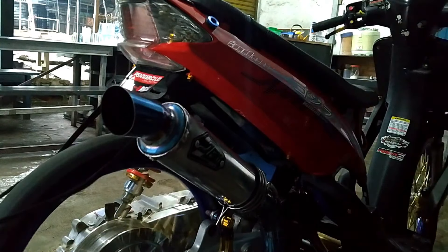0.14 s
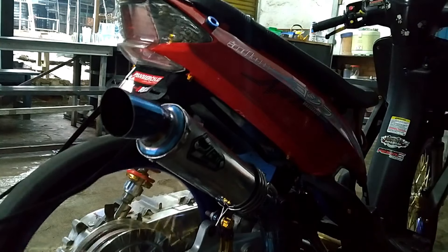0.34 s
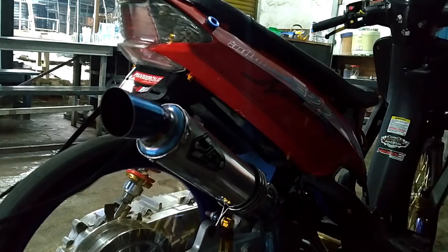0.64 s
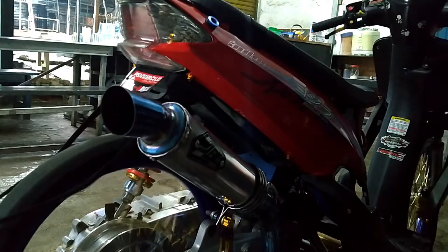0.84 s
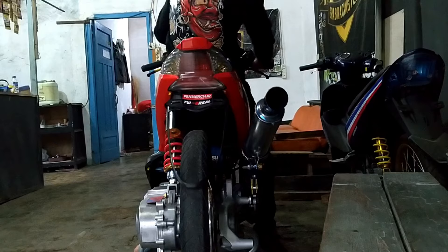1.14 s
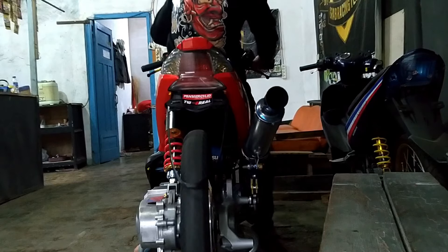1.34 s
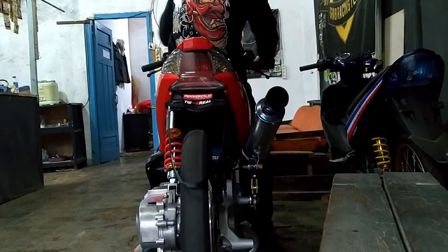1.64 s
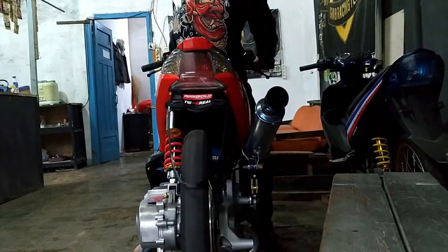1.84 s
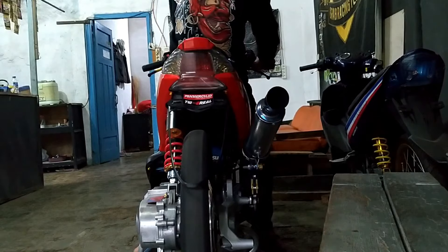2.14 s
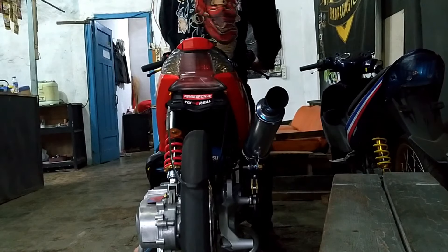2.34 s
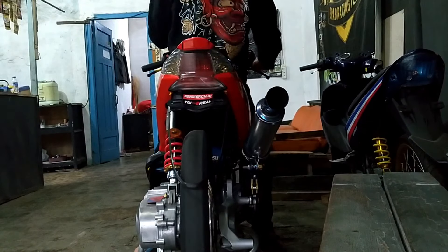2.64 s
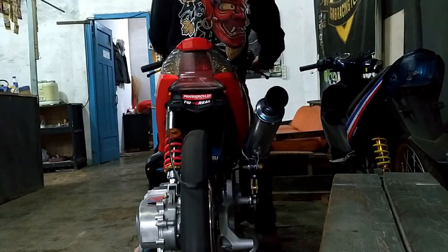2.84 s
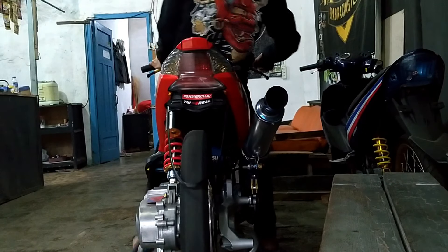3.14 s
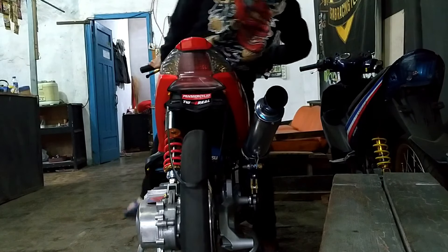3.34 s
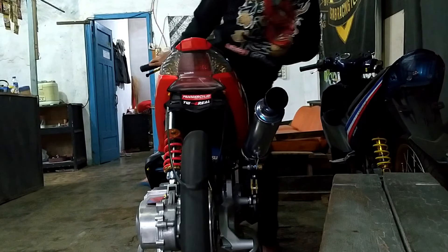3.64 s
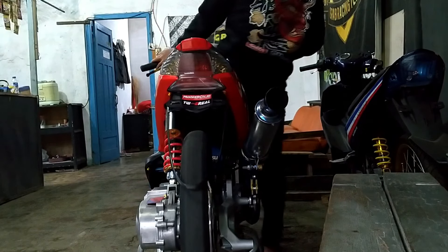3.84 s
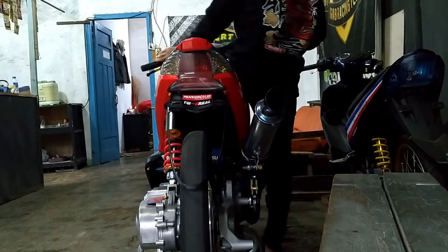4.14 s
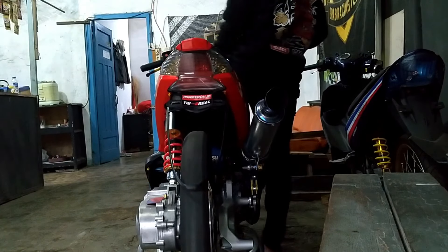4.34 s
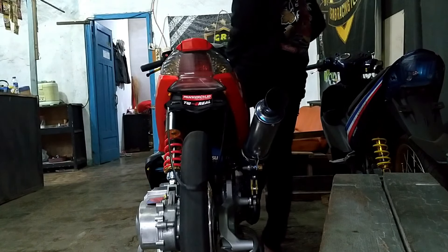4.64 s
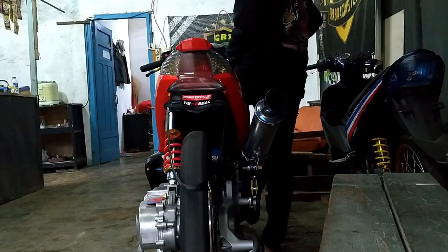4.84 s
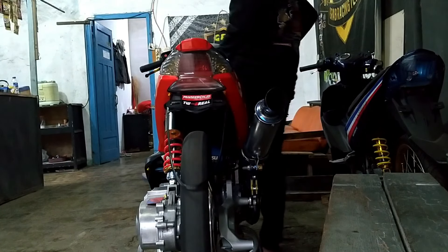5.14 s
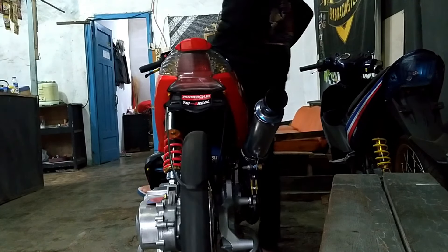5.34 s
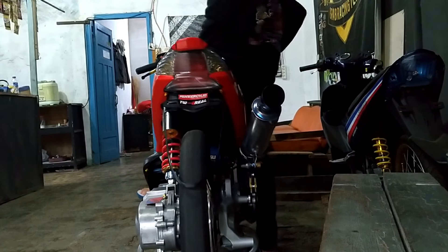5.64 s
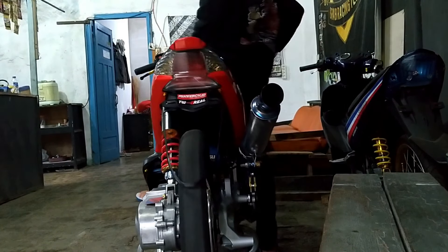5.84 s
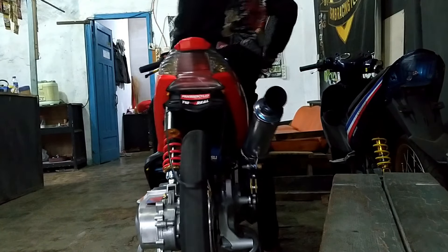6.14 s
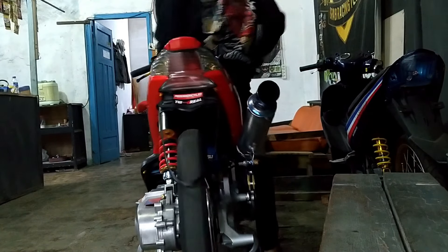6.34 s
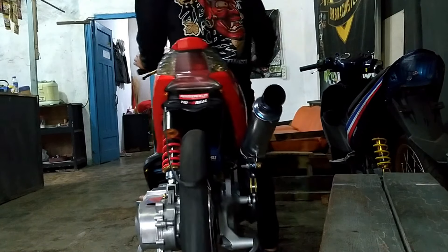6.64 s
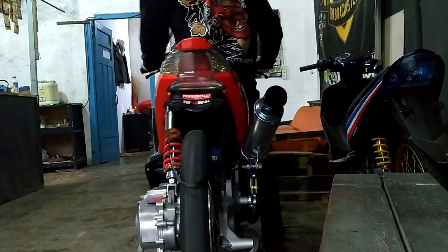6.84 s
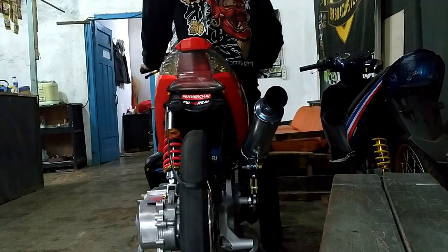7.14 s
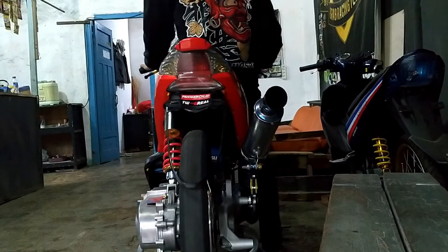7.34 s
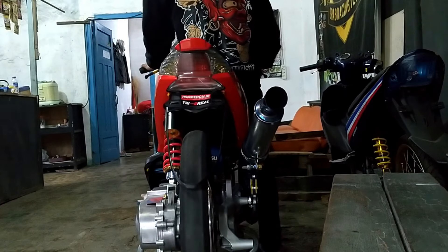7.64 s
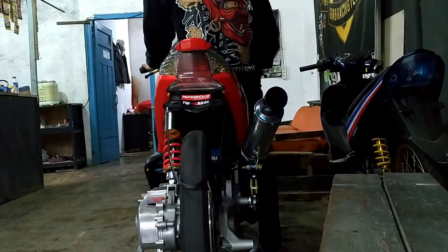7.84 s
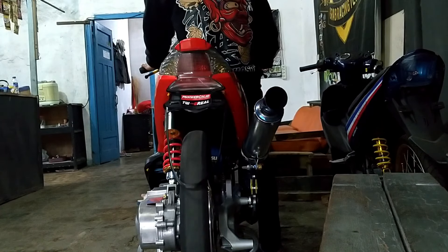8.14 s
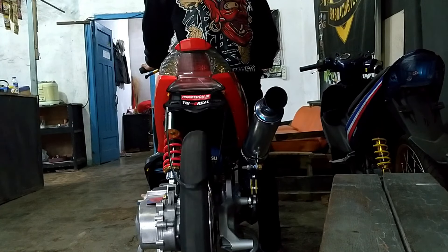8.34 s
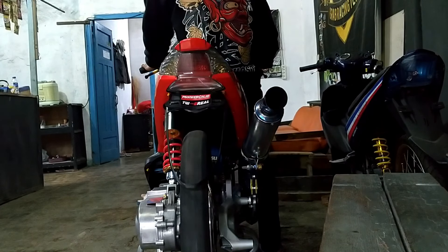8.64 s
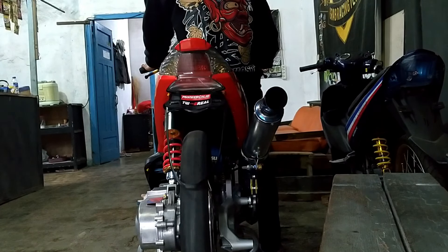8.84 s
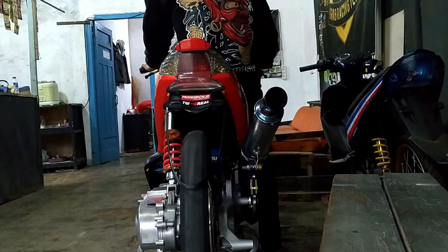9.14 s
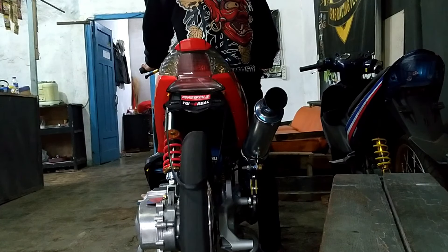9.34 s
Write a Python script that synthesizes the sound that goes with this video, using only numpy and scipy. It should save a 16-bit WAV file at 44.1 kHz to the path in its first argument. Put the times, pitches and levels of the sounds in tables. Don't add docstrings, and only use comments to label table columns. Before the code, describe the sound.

Loud small-motorcycle exhaust: one close crackling rev, an abrupt cut to a boomy workshop, uneven thumping idle with misfires and pops, final throttle blip starting.

```python
import sys
import numpy as np
from scipy import signal
from scipy.fft import rfft, irfft, next_fast_len
from scipy.io import wavfile
from scipy.ndimage import uniform_filter1d, minimum_filter1d, map_coordinates

SR = 44100
rng = np.random.default_rng(int(sys.argv[2]) if len(sys.argv) > 2 else 0)


def materialize(psi):
    bounded = np.clip(np.atleast_2d(psi).T, -1, 1)
    quanta = np.round(bounded * 32767).astype(np.int16)
    wavfile.write(sys.argv[1], SR, quanta)


def attenuation_scalar(level_db):
    decades = np.asarray(level_db, float) / 20
    return 10 ** decades


N = 418068
CUT = 1.078
TIME = np.arange(N) / SR
BESIDE = TIME < CUT
DECAY_TIME = np.arange(SR // 2) / SR


def unit(x):
    return x / np.sqrt(np.mean(x ** 2) + 1e-20)


def curves(rows):
    s, *cols = np.transpose(rows)
    return [np.interp(TIME, s, c) for c in cols]


def noise(spectrum, size):
    f, db = np.transpose(spectrum)
    hz = np.fft.rfftfreq(size, 1 / SR)
    colour = attenuation_scalar(np.interp(np.log(hz + 1), np.log(f), db, -120, -120))
    return unit(irfft(rfft(rng.standard_normal(size)) * colour, size))


def tail(spectrum, t60):
    x = noise(spectrum, size=SR // 2) * attenuation_scalar(-60 * DECAY_TIME / t60)
    return x / np.linalg.norm(x)


def train(times, db):
    at = np.clip(np.round(times * SR).astype(int), 0, N - 1)
    return np.bincount(at, attenuation_scalar(db) * np.sqrt(SR * np.abs(np.gradient(times))), N)


def through(x, response):
    y = signal.fftconvolve(np.trim_zeros(x, "b"), response)[:N]
    return np.pad(y, (0, N - len(y)))


def ring(resonances):
    t, x = DECAY_TIME, 0
    for k, (hz, width, db) in enumerate(resonances):
        sign = (-1) ** k
        x = x + sign * attenuation_scalar(db) * width * np.exp(-np.pi * width * t) * np.sin(2 * np.pi * hz * t)
    x = x * (1 - np.exp(-t / 0.00084))
    return x / np.linalg.norm(x)


def thin(x):
    return signal.sosfilt(signal.butter(N=4, Wn=110, btype="high", fs=SR, output="sos"), x)


def already_ringing():
    return -attenuation_scalar(-4.0 - 60 * TIME / 0.12) * np.cos(2 * np.pi * 117 * TIME)


def firings(speed, anchor):
    t = np.arange(speed[0][0], speed[-1][0], 1 / SR)
    turns = np.cumsum(np.interp(t, *np.transpose(speed))) / SR
    first = np.interp(anchor, t, turns) % 1
    return np.interp(np.arange(first, turns[-1]), turns, t)


# time in seconds, firings completed so far.
IDLE = [(1.816, 0), (2.019, 4), (2.132, 6), (2.985, 19), (3.367, 25), (3.744, 31), (4.003, 35), (4.671, 45),
        (5.199, 53), (5.976, 65), (6.771, 77), (7.03, 81), (7.696, 91), (8.235, 99), (8.629, 105),
        (8.756, 107), (9.025, 111), (9.149, 113)]


def idling():
    s, turn = np.transpose(IDLE)
    return np.interp(np.arange(turn[-1] + 1), turn, s)


# time in seconds, firings a second.
COAST_SPEED = [(0.0, 39.0), (0.114, 36.0), (0.2, 33.6), (0.25, 31.9), (0.335, 30.3)]
# time in seconds, firings a second.
NEAR_SPEED = [(0.34, 31.0), (0.416, 37.0), (0.48, 41.5), (0.65, 50.3), (0.714, 49.1), (0.83, 43.9),
              (1.078, 37.3)]
# time in seconds, firings a second.
REV_SPEED = [(1.167, 17.4), (1.235, 22.1), (1.395, 33.4), (1.445, 36.0), (1.507, 37.7), (1.619, 35.5),
             (1.703, 32.0), (1.753, 28.1), (1.816, 22.9)]
# time in seconds, firings a second.
LAST_SPEED = [(9.202, 19.8), (9.275, 21.7), (9.32, 23.6), (9.37, 24), (9.39, 30.5), (9.43, 28.8),
              (9.48, 28.5)]


def crank():
    near = np.concatenate([firings(COAST_SPEED, .231), firings(NEAR_SPEED, .553)])
    rev, last = firings(REV_SPEED, 1.1671)[:-1], firings(LAST_SPEED, 9.2021)
    return near, np.concatenate([[1.035, 1.103], rev, idling(), last])


# time in seconds, strength in dB.
MISFIRES = [(1.866, -9), (1.917, -3.5), (2.264, -3.5), (2.391, -9), (2.522, -4.5), (3.297, -2),
            (3.428, -3.5), (3.554, -3.5), (4.003, -2.5), (4.538, -8), (8.561, -7), (8.955, -6.5)]


def charges(near, shop):
    shop_db = .8 * rng.standard_normal(len(shop))
    for when, db in MISFIRES:
        shop_db[np.argmin(np.abs(shop - when))] = db
    return .8 * rng.standard_normal(len(near)), shop_db


# time in seconds, opening from 0 to 1.
NEAR_REV = [(0, 0.23), (.08, 0.58), (.325, 0.1), (.345, 0.86), (.5, 0.87), (.6, 0.95), (.735, 0.56),
            (.765, 0.27), (1.07, 0.43)]
# time in seconds, opening from 0 to 1.
SHOP_REV = [(1.09, 0.053), (1.18, 0.07), (1.2, 0.41), (1.25, 0.48), (1.375, 0.69), (1.395, 0.3),
            (1.44, 0.51), (1.52, 0.55), (1.7, 0.32), (2.1, 0.049)]
# time in seconds, opening from 0 to 1.
LAST_REV = [(9.0, 0.0045), (9.13, 0.1), (9.28, 0.23), (9.42, 0.29), (9.48, 0.42)]
# level in dB, dB more at full throttle, dB more for doubled speed,
# dB more while the crank gains speed.
NEAR_MIX = [
    (-9.5, -11, -0.5, 2.5),
    (-7.5, -1, 0, 5),
    (-23, -7, 22.5, -29),
    (-30, 15, 8, 4.5),
    (-12, 6.5, 9.5, -1),
    (-35.5, 11, 8, 2),
    (-55, 18, 4.5, 3.5),
    (-57.5, 5, -1, 3.5),
    (-31, -6, 8, -17),
    (-49, 19, -3, -5),
]
# level in dB, dB more at full throttle,
# dB more for doubled speed, dB more while the crank gains speed.
SHOP_MIX = [(-13.5, -13, 6.5, 2), (-13.5, -10, -3, 3), (-14.5, -2.5, -5, -4), (-53, 24, 4, 11.5),
            (-22.5, 13.5, 7.5, 3.5), (-35.5, 20.5, -1.5, 0.5), (-46, 30, -8, 2), (-52, 0.5, 0.5, 2),
            (-39.5, 6, 14.5, 12), (-54, 16.5, 9.5, 14)]


def layer_levels(near, shop):
    near_hz, idle_hz = 37, 15.2
    pull_from, pull_full = .6, 1.4
    opening, = curves(NEAR_REV + SHOP_REV + LAST_REV)
    levels = []
    for rows, times, hz in (NEAR_MIX, near, near_hz), (SHOP_MIX, shop, idle_hz):
        octaves = -np.log2(hz * np.gradient(times))
        gain = uniform_filter1d(np.gradient(octaves, times), size=3)
        pull = np.clip((gain - pull_from) / (pull_full - pull_from), 0, 1)
        drivers = [np.ones(N), opening, np.interp(TIME, times, octaves), np.interp(TIME, times, pull)]
        levels.append(np.array(rows) @ drivers)
    return np.where(BESIDE, *levels)


# frequency in Hz, level in dB, t60 in seconds, polarity at the microphone.
WORKSHOP = [(76.1, -30.3, 0.654, -1), (100.5, -6.5, 0.227, 1), (112.6, -4.0, 0.115, -1),
            (120.5, -29.7, 0.7, 1), (136.7, -23.4, 0.465, -1), (167.4, -20.6, 0.459, -1),
            (194.6, -17.0, 0.7, 1), (200.2, -9.3, 0.257, 1), (221.8, -18.0, 0.209, -1),
            (242.3, -9.8, 0.252, -1), (259.2, 3.2, 0.179, -1), (258.5, 6.7, 0.104, 1),
            (282.0, -11.0, 0.066, -1), (342.5, -30.0, 0.419, -1), (360.1, -32.2, 0.459, 1),
            (385.5, -23.8, 0.147, -1), (406.4, -38.0, 0.472, 1), (437.0, -27.0, 0.6, -1),
            (466.7, -31.0, 0.177, -1), (543.7, -42.8, 0.398, 1), (598.9, -38.5, 0.311, -1),
            (652.2, -52.8, 0.694, 1)]


def room_modes():
    t, linger, build_s = DECAY_TIME, 1.15, 0.0018
    modes = [sign * attenuation_scalar(db - 60 * t / (linger * t60)) * np.sin(2 * np.pi * hz * t)
             for hz, db, t60, sign in WORKSHOP]
    return np.array(modes) * (1 - np.exp(-t / build_s))


# frequency in Hz, width in Hz, level in dB.
PIPE = [
    (105.4, 15.5, 0),
    (127.5, 25.6, 0),
    (260, 67, 0),
]


def thumps(close, far, modes, thump_db):
    groups = np.split(modes / np.linalg.norm(modes.sum(axis=0)), [5, 8])
    out = 0
    for db, pipe, sign, group in zip(thump_db, PIPE, (1, -1, 1), groups):
        boom = signal.fftconvolve(ring([pipe]), ring([pipe]))[:SR // 3]
        beside = through(close, sign * boom / np.linalg.norm(boom))
        across = attenuation_scalar(0.5) * through(far, group.sum(axis=0))
        out += attenuation_scalar(db) * np.where(BESIDE, beside, across)
    return out


# frequency in Hz, density in dB per Hz.
RUMBLE = [(12, -68.5), (20, -15), (89, -16), (151, -12.5), (195, 3.5), (312, -14), (437, -12.5), (500, -24),
          (650, -38), (1100, -120)]


def rumble(level_db):
    open_air_db = -2.5
    return attenuation_scalar(level_db - 8.0 + open_air_db * BESIDE) * noise(RUMBLE, size=N)


# frequency in Hz, width in Hz, level in dB.
SHOP_BARK = [(206, 20, 3), (264, 21, 11.5), (357, 7.3, 4), (387, 14, -6.5), (438, 9, 8.5),
             (496.4, 25, -2.5), (604.3, 54, -6.5)]


def steep_room(room):
    steep = np.pad(-np.diff(room, n=2), 1) * (1 - np.exp(-DECAY_TIME / .001))
    return steep / np.linalg.norm(steep) + attenuation_scalar(-1.5) * ring(SHOP_BARK)


# frequency in Hz, width in Hz, level in dB.
PIPE_BARK = [(189, 67, 8), (316, 36, -0.5), (372, 31, 6), (462.4, 27, 7), (521, 38, 2), (605, 15, -8),
             (860, 410, -16)]


def bark(close, far, sharp, steep):
    beside = thin(through(sharp * close, ring(PIPE_BARK)))
    return np.where(BESIDE, beside, through(sharp * far, steep))


def gas_flow(close, far, sharp, thump):
    swell = np.exp(-DECAY_TIME / .016) * (1 - np.exp(-DECAY_TIME / .0015))
    gush = np.roll(through(close, np.hanning(SR // 40)), -SR // 65)
    puffs = np.where(BESIDE, gush, through(far, swell))
    puffs /= uniform_filter1d(puffs, SR // 8) + 1e-9
    stops = (close > 0) * np.clip(3 * sharp * rng.uniform(.4, 1.6, N), 0, 1)
    lull = through(np.roll(stops, -SR // 200), np.hanning(SR // 170))
    flow = np.where(BESIDE, (.6 + .4 * puffs) * (1 - .9 * lull), .87 + .13 * puffs)
    return flow * (1 + BESIDE * np.clip(1.1 * thump, -.9, .9))


# frequency in Hz, density in dB per Hz.
BARK = [(160, 14.5), (280, 8.5), (324, 5), (359, -3), (505, 2), (645, -6.5), (1200, -11.5), (1560, -61),
        (2640, -120)]
# frequency in Hz, density in dB per Hz.
RUSH = [(470, 3), (800, 1.5), (924, 0.5), (1330, -3), (1660, -2.5), (2050, -3.5), (2370, -8.5),
        (3160, -12.5), (4050, -21.5), (4990, -25.5), (5400, -32), (7020, -54), (11900, -120)]
# frequency in Hz, density in dB per Hz.
FIZZ = [(2530, -44), (4300, -4.5), (5950, -4.5), (7210, -3.5), (7930, 0), (8190, -21), (8600, -58),
        (11200, -38), (18900, -120)]


def jet(flow, steep, roar_db, rush_db, fizz_db):
    roar = flow * noise(BARK, size=N)
    room_roar = through(flow * rng.standard_normal(N), steep)
    out = attenuation_scalar(roar_db - 4.5) * np.where(BESIDE, unit(roar), unit(room_roar))
    out += attenuation_scalar(rush_db - 1.0) * unit(flow * noise(RUSH, size=N))
    return out + attenuation_scalar(fizz_db - 6.0) * unit(flow * noise(FIZZ, size=N))


# frequency in Hz, width in Hz, level in dB.
NEAR_BLARE = [(125, 3.4, 0), (282.5, 6.9, 8), (356, 16, -23), (435, 19, -8)]
# frequency in Hz, width in Hz, level in dB.
SHOP_BLARE = [(147.7, 28, -1.5), (212, 36, -2.5), (243.7, 26, 5.5), (347.5, 23, 1), (435, 9.9, -7.5),
              (502, 20, -14)]


def blare(close, far, level_db):
    beside = thin(through(attenuation_scalar(level_db) * close, ring(NEAR_BLARE)))
    return np.where(BESIDE, beside, through(attenuation_scalar(level_db) * far, ring(SHOP_BLARE)))


def crackle(close, far, level_db):
    snaps = np.where(BESIDE, close, far) * attenuation_scalar(level_db + 3 * rng.standard_normal(N))
    snap = tail(RUSH, t60=0.017) + attenuation_scalar(-23.0) * tail(FIZZ, t60=0.019)
    return through(snaps, snap * (1 - np.exp(-DECAY_TIME / .003)) * attenuation_scalar(4))


# frequency in Hz, density in dB per Hz.
BUFFET = [(15, -31), (25, 8), (50, -7.5), (70, -28)]


def buffet():
    return BESIDE * attenuation_scalar(-27) * noise(BUFFET, size=N)


# frequency in Hz, density in dB per Hz.
CASE = [(4060, -40), (6900, -45), (7740, -7), (8330, 3.5), (8870, 0.5), (9960, -7), (11200, -9),
        (13000, -9), (15100, -3.5), (15900, -1.5)]
# frequency in Hz, density in dB per Hz.
TICK = [(4300, -36), (5100, -13), (6300, -18), (7600, 2.5), (8400, -11), (12000, -30)]


def valves(times, level_db):
    ticks = train(times + 0.01, 4.9 * rng.standard_normal(len(times))) * (TIME > CUT)
    slow = map_coordinates(rng.standard_normal(N * 30 // SR + 4), [TIME * 30])
    whirr = attenuation_scalar(1.5 * slow + 1.5) * noise(CASE, size=N)
    return attenuation_scalar(level_db) * (whirr + attenuation_scalar(-10) * through(ticks, tail(TICK, t60=.03)))


# time in seconds, load (1 pulling hard, below 0 on overrun).
LOAD = [(0, 0.22), (.33, 0.74), (.37, 0.9), (.55, 1), (.63, 0.42), (.75, 1), (.8, 0.67), (1.25, -0.077),
        (1.32, 0.94), (1.42, 0.63), (1.5, -0.47), (1.7, 0.24), (1.78, -0.2), (9.28, 0.04), (9.35, 1),
        (9.48, 1)]
# time in seconds, change of upper thump, bark, roar and blare in dB,
# change of low and middle thump and rumble in dB.
REV_LEVELS = [(0, -2, -1.5), (.2, -2, 0.5), (.25, -1, -4), (.325, -15, -5), (.345, -2, -3.5), (.45, -1, -4.5),
              (.55, -1.5, -5), (.7, -2.5, -1.5), (.85, -5, -4), (1.07, -2, -3.5), (1.2, 1.5, 4.5), (1.28, 2, -8),
              (1.38, -2, -3), (1.45, 0, -9.5), (1.53, -2.5, -0.5), (1.62, -2.5, 2), (1.75, 0.5, 1),
              (9.15, 1.5, 0.5), (9.22, 0, 3.5), (9.29, 2.5, 0), (9.35, 4.5, -3), (9.41, 2, -5), (9.48, 5.5, -3.5)]


def engine():
    near, shop = crank()
    near_db, shop_db = charges(near, shop)
    close, far = train(near, near_db), train(shop, shop_db)
    levels = layer_levels(near, shop)
    thump_db = levels[:3]
    bark_db, roar_db, rush_db, fizz_db, whirr_db, blare_db, crackle_db = levels[3:]
    (load,), (upper_db, boom_db) = curves(LOAD), curves(REV_LEVELS)
    thump_db = thump_db + np.array([boom_db, boom_db, upper_db]) + np.outer((-6.5, -4.5, 5.5), load)
    sharp = attenuation_scalar(bark_db + upper_db + 3.5 * load)
    modes = room_modes()
    steep = steep_room(modes.sum(axis=0))
    thump = thumps(close, far, modes, thump_db)
    flow = gas_flow(close, far, sharp, thump)
    out = thump + rumble(thump_db[0]) + bark(close, far, sharp, steep)
    out += jet(flow, steep, roar_db + upper_db, rush_db, fizz_db)
    out += blare(close, far, blare_db + upper_db) + crackle(close, far, crackle_db) + buffet()
    duck, flutter = .5, 0.36
    squeeze = np.exp(flutter * thump - duck * 2 * uniform_filter1d(np.abs(thump), SR // 80))
    return out + unit(squeeze) * valves(shop, whirr_db - 5.5 * load)


# start in seconds, end in seconds, order of the firing rate, level in dB.
SINGS = [(0.032, 0.203, 5, -17), (0.224, 0.374, 4, -11), (.34, 0.432, 8, -9), (0.377, 0.517, 5, -9.5),
         (0.41, 0.556, 7, -31.5), (0.645, 0.895, 4, -10.5), (0.742, 0.877, 6, -9), (0.913, 1.07, 6, -17),
         (.93, 1.069, 5, -22), (1.015, 1.068, 7, -19), (0.996, 1.075, 12, -20.5), (1.265, 1.36, 13, -10),
         (1.407, 1.514, 11, -13.5), (1.51, 1.698, 6, -10.5), (1.625, 1.742, 7, -16),
         (1.658, 1.756, 12, -12), (9.2, 9.3, 14, -19), (9.26, 9.367, 10, -11.5), (9.29, 9.378, 15, -13.5),
         (9.383, 9.52, 9, -10.5), (9.392, 9.498, 5, -18), (9.386, 9.5, 12, -20)]


def singing():
    near, shop = crank()
    out = np.zeros(N)
    near_turns = np.interp(TIME, near, np.arange(len(near)))
    shop_turns = np.interp(TIME, shop, np.arange(len(shop)))
    turns = np.where(BESIDE, near_turns, shop_turns)
    turns = uniform_filter1d(turns, SR // 40)
    for start, end, order, db in SINGS:
        first, last = round(start * SR), round(end * SR)
        part = slice(first, last)
        swell = np.sqrt(np.hanning(last - first))[:len(turns[part])]
        out[part] += attenuation_scalar(db) * swell * np.sin(2 * np.pi * round(order) * turns[part])
    return out


# time in seconds, peak in dB.
SPITS = [(0.0338, -37), (0.0448, -21), (0.0588, -23), (0.0853, -24), (0.1032, -25), (0.1291, -25),
         (0.164, -33), (0.19, -24), (0.229, -22), (0.2593, -27), (0.2957, -36), (0.3166, -34),
         (0.338, -14.5), (0.3822, -23), (0.41, -15), (0.4215, -14), (0.469, -24), (0.4795, -27),
         (0.5147, -11), (0.5541, -12), (0.579, -12), (0.5943, -12), (0.618, -8.5), (0.662, -16),
         (0.7045, -23), (0.7228, -16.5), (0.7582, -23),
         (1.1355, -27), (1.1503, -19.5), (1.1944, -15), (1.2217, -18), (1.2446, -15), (1.271, -14),
              (1.305, -26), (1.3284, -22), (1.3434, -14), (1.3903, -22)]
# frequency in Hz, density in dB per Hz.
SPIT = [(900, -21), (1500, -2), (2500, 1.5), (3600, -3), (4300, -15.5), (7200, -7.5), (8000, -9),
        (8300, -49.5)]


def spits():
    out, t = np.zeros(N + SR), DECAY_TIME
    for s, db in SPITS:
        burst = tail(SPIT, t60=0.027) * (1 - np.exp(-t / 0.0011))
        out[round(s * SR):][:len(t)] += attenuation_scalar(db + 14) * burst
    return out[:N]


# time in seconds, peak in dB.
POPS = [(0.079, -16), (0.164, -7.5), (0.23, -9), (0.33, -35), (0.352, -15), (0.385, -11.5), (0.407, -3),
        (0.431, -18.5), (0.471, -3), (0.49, -10.5), (0.511, 1), (0.532, -9), (0.553, -7.5), (0.58, -6),
        (0.596, -8.5), (0.616, -3), (0.638, -11), (0.652, -6), (0.682, -11), (0.707, -15), (0.725, -13),
        (0.739, -3), (0.761, -10), (1.03, -26), (1.169, -9), (1.219, -15), (1.263, -16), (1.302, -18),
        (1.341, -13), (1.369, -14), (1.443, -15), (1.5, -14), (1.815, -14), (9.204, -18), (9.252, -11),
        (9.298, -22), (9.34, -17), (9.382, -18), (9.415, -11), (9.45, -15)]
# time in seconds, peak in dB.
IDLE_POPS = [(1.966, -14), (2.196, -19), (2.326, -16), (2.591, -16), (2.656, -19), (2.853, -21),
             (2.92, -31), (2.984, -22), (3.049, -20), (3.112, -10.5), (3.24, -15.5), (3.367, -5),
             (3.492, -11), (3.616, -7), (3.744, -15.5), (3.874, -19), (3.94, -12), (4.136, -25),
             (4.202, -19), (4.337, -28), (4.472, -18), (4.604, -21), (4.671, -19), (4.736, -12),
             (4.999, -21), (5.065, -19), (5.134, -19), (5.199, -9.5), (5.458, -14), (5.592, -15),
             (5.653, -22), (5.783, -15), (5.913, -15), (6.175, -25), (6.241, -21), (6.307, -13),
             (6.637, -34), (6.771, -16), (6.899, -11), (6.964, -17), (7.163, -30), (7.296, -35),
             (7.362, -37), (7.496, -17), (7.563, -10), (7.633, -14), (7.695, -20), (7.832, -25), (8.1, -33),
             (8.17, -11.5), (8.301, -12), (8.498, -16), (8.629, -7), (9.025, -12), (9.09, -11)]
# frequency in Hz, density in dB per Hz.
CRACK = [(250, -18), (600, 11), (1500, -1), (2300, -9), (3500, -32), (5000, -55)]


def pops():
    out = np.zeros(N + SR)
    u = DECAY_TIME / .00055
    front = (1 - u / 1.8) * np.exp(-u) * (1 - np.exp(-u / .35)) ** 3
    late = [(s, db - 2) for s, db in IDLE_POPS]
    faint = [(s, -26.5 - 2.5 * rng.normal()) for s in idling()]
    for s, db in POPS + late + faint:
        rattle = tail(CRACK, t60=0.011) * (1 - np.exp(-u))
        out[round(s * SR):][:len(u)] += attenuation_scalar(db) * (attenuation_scalar(9.5) * front + attenuation_scalar(13.0) * rattle)
    return out[:N]


# time in seconds, peak in dB, ring in Hz.
KNOCKS = [(1.3244, -22, 6750), (2.6593, -26.5, 7700), (3.052, -31.5, 5100), (3.116, -29.5, 5700),
          (3.617, -26, 5850), (4.1389, -45, 7640), (4.6737, -33, 8350), (5.203, -32, 7640),
          (5.333, -31.5, 7000), (5.6586, -28, 7740), (6.179, -25, 7750), (6.311, -27, 7900),
          (6.375, -35, 4950), (6.572, -35, 7740), (6.6437, -26.5, 7870), (6.902, -30, 7650),
          (6.967, -30, 8130), (7.5647, -32, 7600), (7.7661, -36, 7850), (8.1742, -27, 7900),
          (8.238, -30, 5260), (8.502, -31, 7850), (9.0938, -26, 8330), (9.2063, -28, 6220),
          (9.2412, -27, 7560)]


def knocks():
    out, t = np.zeros(N + SR), np.arange(SR // 10) / SR
    soft = []
    for s in idling():
        hz = rng.choice((5110, 7500)) * rng.normal(1, 0.026)
        soft.append((s + 0.0019, -38.5 + 2 * rng.normal(), hz))
    for s, db, hz in KNOCKS + soft:
        rough = 1 + .6 * uniform_filter1d(rng.standard_normal(len(t)), SR // 900) * 7
        ping = rough * np.sin(2 * np.pi * hz * t) * attenuation_scalar(-60 * t / 0.031)
        tick = attenuation_scalar(-2.5) * np.diff(rng.standard_normal(len(t) + 1)) * attenuation_scalar(-60 * t / 0.0052)
        out[round(s * SR):][:len(t)] += attenuation_scalar(db - 7.5) * (ping + tick)
    return out[:N]


# frequency in Hz, level in dB.
HUMS = [(436.6, -31.5), (382.6, -35), (598.4, -44)]


def wander():
    return map_coordinates(rng.standard_normal(N * 6 // SR + 4), [6 * TIME])


def hums():
    idle = np.interp(TIME, [1.7, 2.1, 8.9, 9.1], [0, 1, 1, 0])
    out = np.zeros(N)
    for hz, db in HUMS:
        swell, slip = wander(), wander()
        out += attenuation_scalar(db + 2.9 * swell) * np.sin(2 * np.pi * hz * TIME + 1.16 * slip)
    return idle * out


def scene():
    splice = np.clip(np.abs(TIME - CUT) / .003, 0, 1)
    motor = splice * (engine() + singing())
    return (already_ringing() + motor + spits() + pops() + knocks() + hums())[None]


# time in seconds, share of the local mean that a line must exceed to survive.
STARVED = [(.72, 0), (.8, .9), (1.06, 1.1), (1.4, 1.1), (1.7, .8), (1.95, 0)]


def starve(x):
    hz, t, z = signal.stft(x, SR, nperseg=1024)
    mean = uniform_filter1d(uniform_filter1d(np.abs(z), 24, axis=1), 3, axis=2)
    share = np.interp(t, *np.transpose(STARVED)) * (hz[:, None] > 7800)
    kept = uniform_filter1d(np.abs(z), 3, axis=2) > share * mean
    return signal.istft(z * np.where(kept, 1, .05), SR, nperseg=1024)[1][:, :N]


def low_pass(x):
    return signal.sosfilt(signal.butter(12, 17050, fs=SR, output="sos"), x)


def record(dry):
    x = signal.sosfilt(signal.butter(N=3, Wn=52, btype="high", fs=SR, output="sos"), dry)
    hold = SR // 300
    gain = minimum_filter1d(np.minimum(1, 1 / np.abs(x + 1e-9)), 2 * hold)
    x = x * uniform_filter1d(gain, hold)
    drive_db, knee = 0.96, 3.3
    x = x * ((1 + attenuation_scalar(drive_db * knee)) / (1 + np.abs(attenuation_scalar(drive_db) * x) ** knee)) ** (1 / knee)
    size = next_fast_len(N + SR // 4)
    x = irfft(rfft(x, size) * (np.fft.rfftfreq(size, 1 / SR) < 15850), size)[:, :N]
    return low_pass(starve(x))


dry = scene()
out = record(dry)
materialize(out)
```